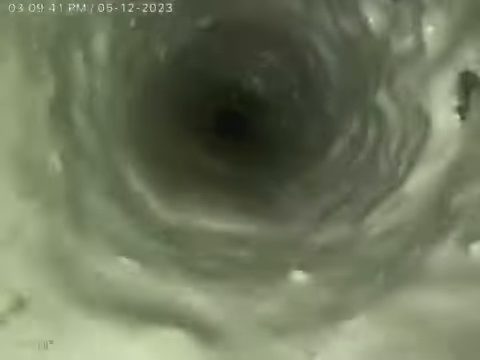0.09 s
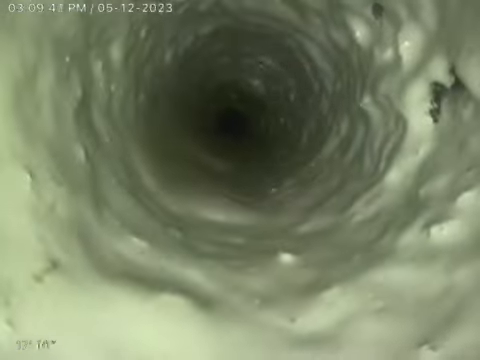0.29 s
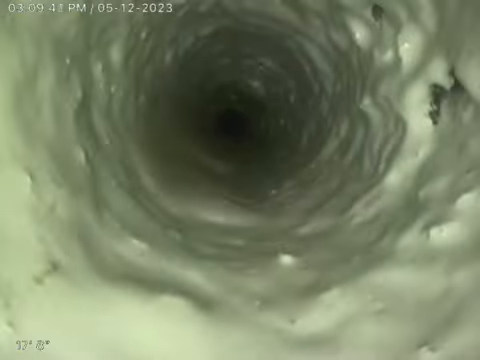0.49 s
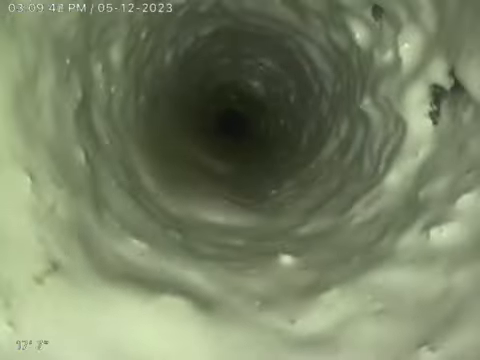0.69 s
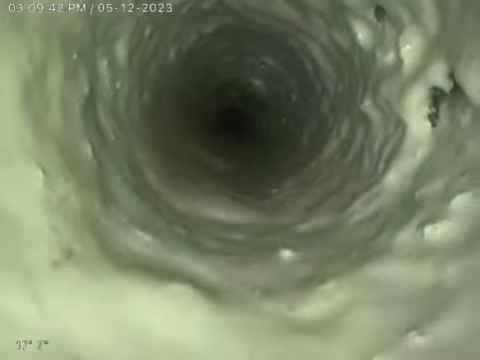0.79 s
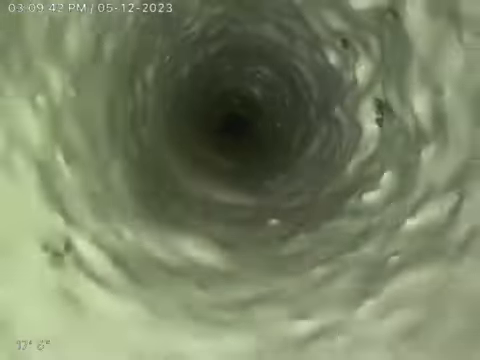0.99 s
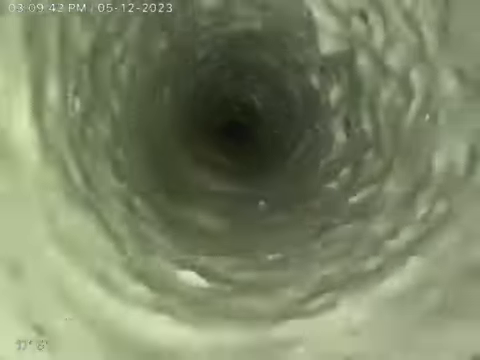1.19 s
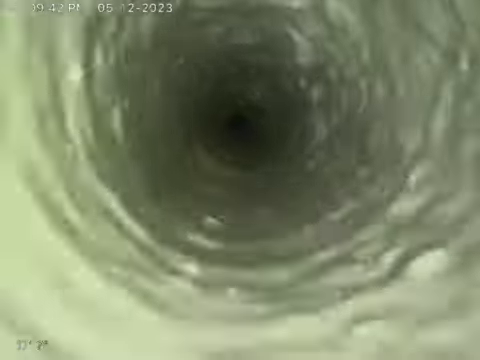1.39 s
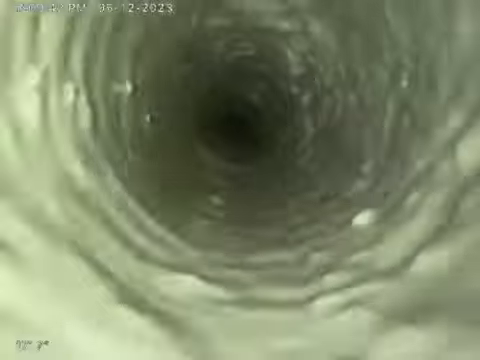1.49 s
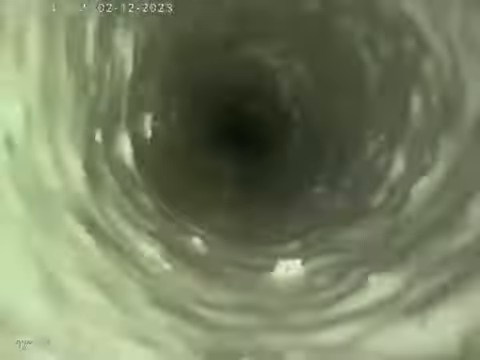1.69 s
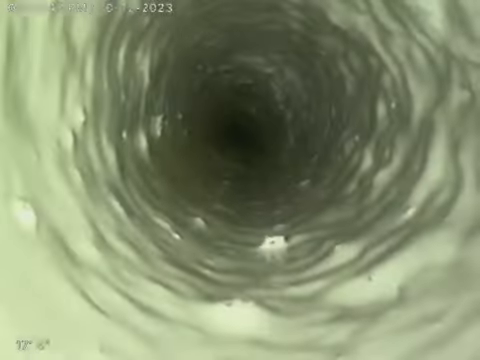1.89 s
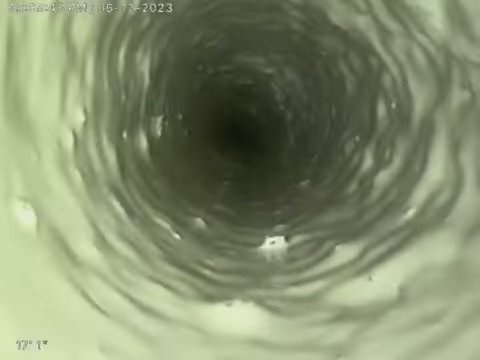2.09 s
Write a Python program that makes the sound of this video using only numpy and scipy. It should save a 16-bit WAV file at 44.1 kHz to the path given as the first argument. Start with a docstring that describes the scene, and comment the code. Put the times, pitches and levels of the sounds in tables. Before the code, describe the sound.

Irregular clicks and knocks of a push cable dragged back through a hollow drain pipe

```python
"""Knocks of a push cable drawn back through a drain pipe: bursts of tiny contacts ring the modes of its coil,
shaped band by band, the lows a little late. Thuds are soft blows on the coil's low modes. Dense filtered contacts
make a hollow rumble, including the big thud's dying tail, and the scrape of sliding. A small room adds a diffuse
tail to the knocks. Behind lie a steady low drone, faint hiss and narrow bands of steady noise."""
import sys
import numpy as np
from scipy import signal
from scipy.fft import rfft, irfft
from scipy.io import wavfile
from scipy.ndimage import uniform_filter1d

SR = 44100
rng = np.random.default_rng(int(sys.argv[2]) if len(sys.argv) > 2 else 0)


def put_to_file(sound):
    """Save the sound as 16-bit audio at rate SR, in the file named by the first command-line argument."""
    columns = np.atleast_2d(sound).T  # one column per channel
    safe = np.clip(columns, -1, 1)
    whole_steps = np.round(safe * 32767)
    wavfile.write(sys.argv[1], SR, whole_steps.astype(np.int16))


N = 92610  # samples


def undb(db):
    """Decibels to amplitude gain."""
    return 10 ** (np.asarray(db) / 20)


def unit(x):
    """Scale to rms 1."""
    return x / np.sqrt(np.mean(x ** 2))


def colour(x, points):
    """Filter by a (Hz, relative dB) curve, with sloping skirts beyond its ends; rms 1."""
    hz, db = np.array(points, float).T
    f = np.maximum(np.fft.rfftfreq(N, 1 / SR), 1)
    skirts = np.minimum(f / hz[0], 1) ** 2 * np.minimum(hz[-1] / f, 1) ** 2
    gain = undb(np.interp(np.log(f), np.log(hz), db)) * skirts
    return unit(irfft(rfft(x) * gain, N))


def band(x, lo_hz, hi_hz):
    """Causal band-pass."""
    return signal.sosfilt(signal.butter(3, [lo_hz, hi_hz], "band", fs=SR, output="sos"), x)


def resonate(x, hz, width_hz):
    """One resonance, gain 1 at its centre."""
    return signal.lfilter(*signal.iirpeak(hz, hz / width_hz, fs=SR), x)


def grit(spread_db, per_s):
    """Dense tiny contacts of random sign and unequal size; rms 1."""
    size = undb(spread_db * np.minimum(rng.exponential(size=N), 4))
    hits = rng.standard_normal(N) * size * (rng.random(N) < per_s / SR)
    return unit(hits)


def walk(rate_hz):
    """Slow random curve of rms 1: held random values, smoothed over one step."""
    step = int(SR / rate_hz)
    held = np.repeat(rng.standard_normal(N)[:N // step + 1], step)[:N]
    return unit(uniform_filter1d(held, step))


# Low modes of the coil. Each row: frequency in Hz, relative level in dB, t60 in s.
THUD_MODES = [(179.8, -19.5, 0.11), (215, -6.5, 0.17), (237.4, 2.5, 0.09), (284, 4.5, 0.027),
              (309, -10.5, 0.091), (344, -20.5, 0.1)]
# Bright modes of cable and cage. Each row: frequency in Hz, relative level in dB, t60 in s.
RING_MODES = [(530, 3, 0.054), (656, -13.5, 0.18), (806, 3.5, 0.15), (962, 4.5, 0.056), (1135, 3, 0.032),
              (1315, -2.5, 0.031), (1441, -1, .08), (1627, 4, 0.13), (1830, 6.5, 0.04), (2110, -3.5, 0.045),
              (2424, -3, 0.2), (2718, 9, 0.081), (3300, -4, 0.13), (3737, 2.5, 0.11), (4488, 3, 0.021),
              (5220, 3, 0.053)]
CRACK_DB = 0  # bare contact beside the modes


def ring(contacts):
    """Contacts excite every mode, decay time setting its bandwidth, over their own bare crack."""
    modes = 0
    for hz, db, t60_s in THUD_MODES + RING_MODES:
        width_hz = np.log(1000) / np.pi / t60_s
        modes = modes + undb(db) * resonate(contacts, hz, width_hz)
    return undb(CRACK_DB) * contacts + 2 * modes


# Edges of the five bands, low to high, in Hz.
BANDS_HZ = [140, 400, 800, 1500, 3500, 7200]
# Knocks. Each row: time in s, level in dB in each of the five bands, swell in s, hold in s, fall in s.
KNOCKS = [ (.021, -72, -52, -48.5, -47.5, -74, 0.0013, 0.0049, 0.012),
          (0.177, -46.5, -54.5, -39.5, -35, -46, 0.0038, 0.0027, 0.0065),
          (0.233, -25.5, -20.5, -20, -26.5, -41, 0.0011, 0.0074, 0.0034),
          (.246, -30, -32.5, -32, -32.5, -43, 0.0021, 0.0023, 0.0088),
          (.278, -26.5, -30, -34.5, -41, -51.5, 0.0069, 0.0054, 0.0093),
          (0.38, -37, -43, -44.5, -47.5, -55, .004, 0.0031, 0.0057),
          (0.499, -41, -45, -34, -34, -48, 0.0093, 0.0054, 0.0021),
          (0.553, -52, -48.5, -44.5, -50, -66, 0.004, 0.0039, 0.0039),
          (.631, -53, -65.5, -45, -38.5, -55.5, 0.0032, 0.014, 0.0092),
          (0.662, -45, -56, -51, -45, -58, 0.0028, 0.002, 0.0037),
          (0.698, -38.5, -44, -31.5, -39.5, -57.5, 0.0014, 0.0047, 0.011),
          (0.75, -52, -46, -45.5, -53.5, -59, 0.0052, 0.0026, 0.0077),
          (.816, -34, -34.5, -27.5, -31.5, -36.5, 0.0057, 0.0086, 0.0032),
          (.832, -45, -51, -35, -36.5, -41.5, 0.0041, 0.0041, 0.012),
          (0.904, -26, -26, -35, -48.5, -63, 0.0011, 0.005, 0.0039),
          (1.076, -51, -58, -52.5, -55, -67, .003, .004, 0.011),
          (1.115, -56, -79, -58, -67, -60.5, 0.0072, 0.005, 0.0023),
          (1.195, -46, -55, -65, -73, -63, 0.0018, 0.0042, .005),
          (1.387, -46, -53, -41.5, -33.5, -41, 0.0011, 0.0043, 0.0026),
          (1.397, -40, -34, -27, -23, -27.5, 0.0029, 0.0078, 0.0068),
          (1.698, -36, -44.5, -64, -47, -57, 0.0016, 0.0026, 0.0069),
          (1.768, -43, -49, -46, -36, -45, 0.0037, .007, 0.0037),
          (1.817, -39, -41, -44, -51, -56, 0.013, 0.0056, 0.0072)]
LAG_S = 0.0049  # bending-wave lag scale: half of it separates 500 Hz from 2 kHz
CONTACT_SPREAD_DB = 2


def knocks(t):
    """Catch-and-slip rattles swell, hold and die away; bending waves bring the lows last."""
    contacts = ring(grit(CONTACT_SPREAD_DB, 6000))
    out = np.zeros(N)
    for k, (lo, hi) in enumerate(zip(BANDS_HZ, BANDS_HZ[1:])):
        rattle = band(contacts, lo, hi)
        centre_hz = np.sqrt(lo * hi)
        late_s = LAG_S * (np.sqrt(500 / centre_hz) - .5)  # zero at 2 kHz, early above
        for at_s, *levels_db, swell_s, hold_s, fall_s in KNOCKS:
            near = slice(max(int((at_s - .03) * SR), 0), int((at_s + .12) * SR))
            age = t[near] - at_s - late_s
            rise = np.maximum((-age - hold_s / 2) / swell_s, 0) ** 2
            decay = np.maximum((age - hold_s / 2) / fall_s, 0)
            env = np.exp(-rise - decay)
            burst = rattle[near] * env
            level = np.sqrt(np.sum(env ** 2) / np.sum(burst ** 2))  # same energy as env
            out[near] += burst * level * undb(levels_db[k])
    return out


# Thuds of the whole coil. Each row: time in s, peak of its own ring in dB before the recorder.
THUDS = [(.237, -8.5), (0.265, -22), (0.493, -33), (0.701, -28.5), (.812, -38.5), (0.908, -33),
         (1.397, -29.5), (1.697, -27.5), (1.752, -28.5), (1.939, -31.5)]
THUD_PUSH_S = .0015  # build-up time constant of a soft blow


def thuds(t):
    """A soft blow sets the low modes of the coil swinging; each decays at its own rate."""
    blows = np.zeros(N)
    for at_s, db in THUDS:
        blows[int(at_s * SR)] += undb(db)
    body = 0
    for hz, db, t60_s in THUD_MODES:
        body = body + undb(db) * np.sin(2 * np.pi * hz * t) * undb(-60 * t / t60_s)
    body = body * (1 - np.exp(-t / THUD_PUSH_S))
    body = signal.sosfilt(signal.butter(2, BANDS_HZ[0], "high", fs=SR, output="sos"), body)
    return signal.fftconvolve(blows, body / np.abs(body).max())[:N]


# Rumble, including the big thud's tail, and scrape. Each row: time in s, rumble level in dB, scrape level in dB.
RUMBLE_SCRAPE_LEVELS = [(0, -65, -51.5), (.11, -48.5, -51), (0.209, -44.5, -46.5), (0.283, -28.5, -41),
                        (.35, -40, -44.5), (.46, -53, -43), (.59, -54, -51), (.76, -55.5, -50.5),
                        (.89, -41.5, -49), (1.0, -58, -58.5), (1.33, -52.5, -54), (1.46, -48, -52.5),
                        (1.62, -44, -48.5), (1.71, -40, -44), (1.835, -39, -39), (1.96, -38.5, -43.5),
                        (2.1, -46, -47.5)]
# Rumble spectrum. Each row: frequency in Hz, relative level in dB.
RUMBLE = [(100, -20), (150, -2.5), (185, 4), (225, 5), (265, -6), (310, 0), (400, -11.5), (600, -52)]
# Scrape spectrum. Each row: frequency in Hz, relative level in dB.
SCRAPE = [(250, 6.5), (420, 3), (570, 4.5), (700, -5), (830, 0), (1200, -3), (1900, -6), (2300, -9.5),
          (2900, -6), (4200, -16), (7000, -20.5)]


def rumble_and_scrape(t):
    """Low rumble, including the big thud's dying tail, and the scrape of sliding: dense coloured contacts."""
    at_s, rumble_db, scrape_db = np.array(RUMBLE_SCRAPE_LEVELS).T
    rumble_gain = undb(np.interp(t, at_s, rumble_db))
    rumble = colour(grit(0.9, 1500), RUMBLE) * rumble_gain
    scrape = colour(grit(0.73, 4000), SCRAPE)
    scrape_gain = undb(np.interp(t, at_s, scrape_db) + 0.44 * walk(30))
    return rumble + scrape * scrape_gain


# Room tail, one row per band. Each row: level in dB, t60 in s.
ROOM = [(-22.5, 0.25), (-28, 0.29), (-25.5, 0.33), (-24, 0.5), (-19, 0.41)]


def room(x, t):
    """A diffuse tail of noise, decaying at its own rate in each band."""
    tail = 0
    for lo, hi, (db, t60_s) in zip(BANDS_HZ, BANDS_HZ[1:], ROOM):
        build_up = 1 - np.exp(-t / 0.0027)
        echoes = band(rng.standard_normal(N), lo, hi) * undb(-60 * t / t60_s) * build_up
        tail = tail + undb(db) * echoes / np.linalg.norm(echoes)
    return x + signal.fftconvolve(x, tail)[:N]


# Drone spectrum. Each row: frequency in Hz, relative level in dB.
DRONE = [(20, -15.5), (35, -22), (48, 3), (60, 9.5), (80, 2.5), (110, 7), (150, -12), (230, -14.5),
         (350, -25.5), (600, -27)]
# Hiss spectrum. Each row: frequency in Hz, relative level in dB.
HISS = [(200, 6.5), (600, -7.5), (1000, -5), (1750, 6), (2300, -2), (3000, 1.5), (3700, -25), (4150, -7.5),
        (5000, -3), (7000, -11)]
# Narrow bands of steady background noise. Each row: centre in Hz, width in Hz, rms level in dB.
NARROW_NOISE = [(57, 2.6, -63), (221, 24, -67), (1743, 52, -69), (3640, 150, -64)]
DRONE_DB, HISS_DB = -48, -59.5  # rms, before the recorder


def background():
    """Steady noise coloured as low drone and hiss, plus faint narrow bands of noise."""
    narrow = 0
    for hz, width_hz, db in NARROW_NOISE:
        narrow = narrow + undb(db) * unit(resonate(rng.standard_normal(N), hz, width_hz))
    drone = undb(DRONE_DB) * colour(rng.standard_normal(N), DRONE)
    hiss = undb(HISS_DB) * colour(rng.standard_normal(N), HISS)
    return drone + narrow + hiss


def scene():
    """Knocks in the room, with thuds, rumble, scrape and background added directly."""
    t = np.arange(N) / SR
    return (room(knocks(t), t) + thuds(t) + rumble_and_scrape(t) + background())[None]


MIC_LOW_HZ, MIC_HIGH_HZ, TOP_HZ = 36.7, 5560, 6900


def record(dry):
    """The recorder cuts the deepest bass, softens the treble and stops sharply at its band edge."""
    dry = signal.sosfilt(signal.butter(4, MIC_LOW_HZ, "high", fs=SR, output="sos"), dry)
    dry = signal.sosfilt(signal.butter(2, MIC_HIGH_HZ, fs=SR, output="sos"), dry)
    return signal.sosfilt(signal.ellip(10, .2, 80, TOP_HZ, fs=SR, output="sos"), dry)


dry = scene()
out = record(dry)
put_to_file(out)
```